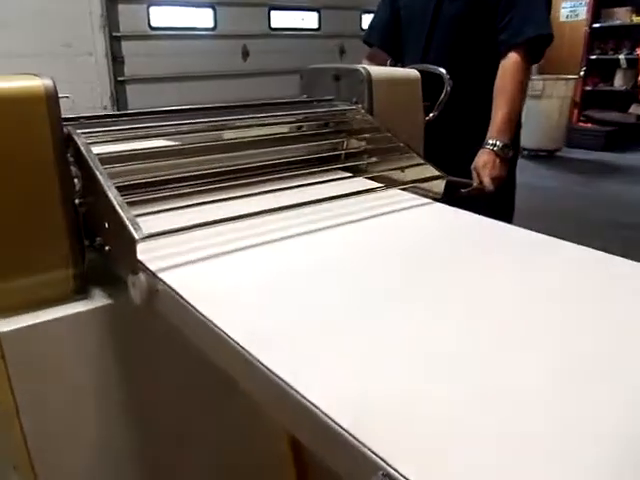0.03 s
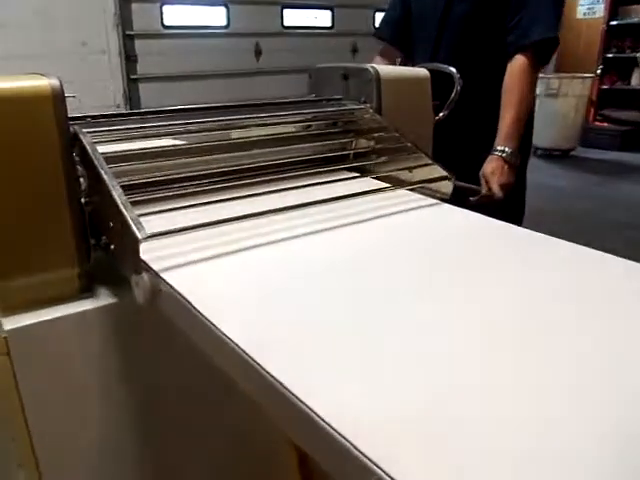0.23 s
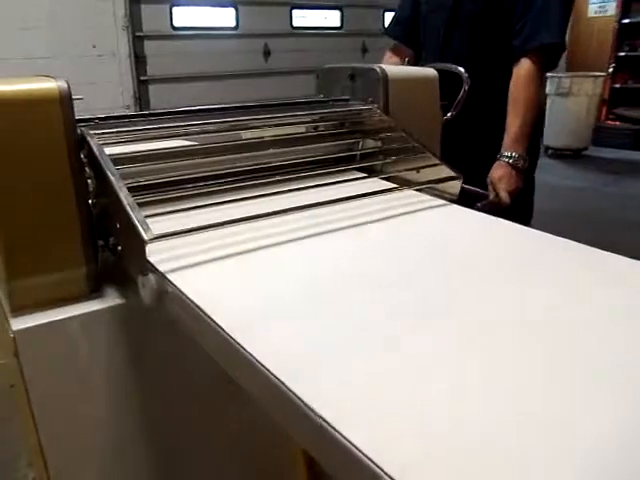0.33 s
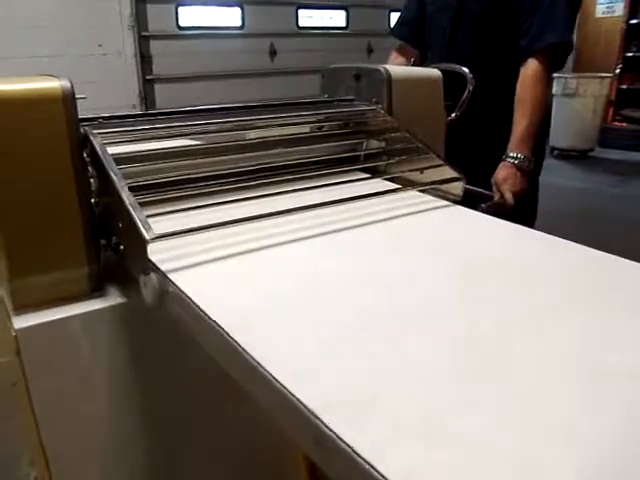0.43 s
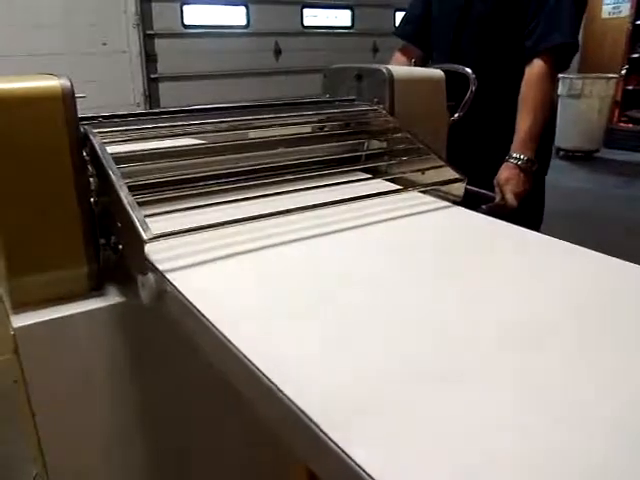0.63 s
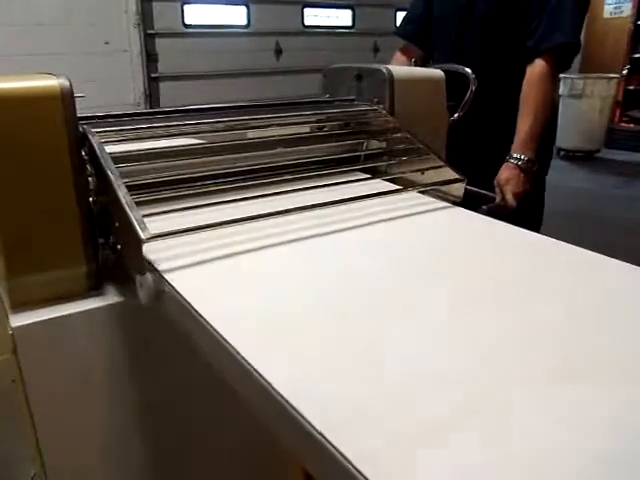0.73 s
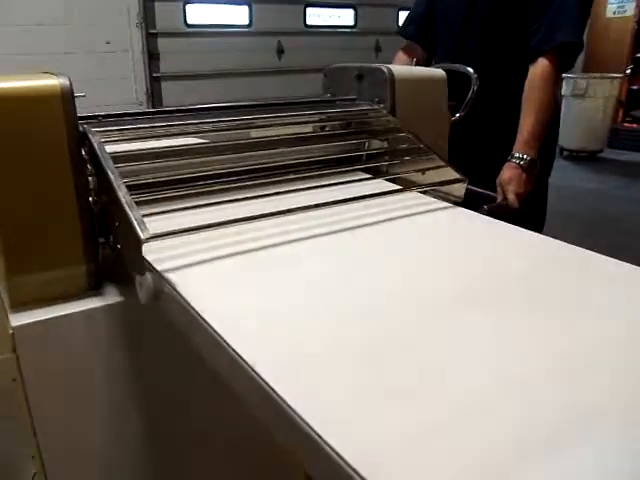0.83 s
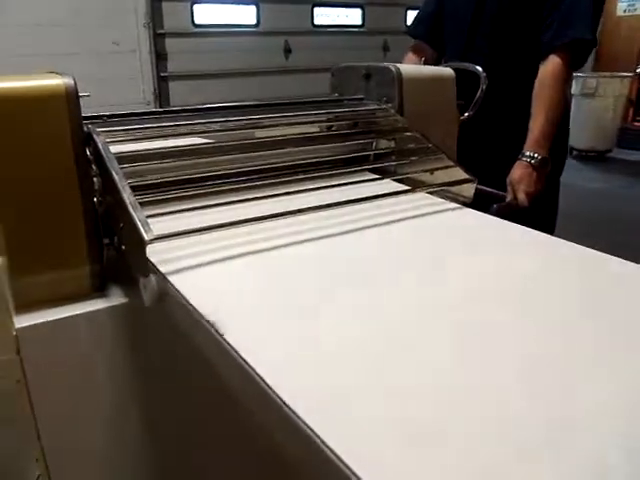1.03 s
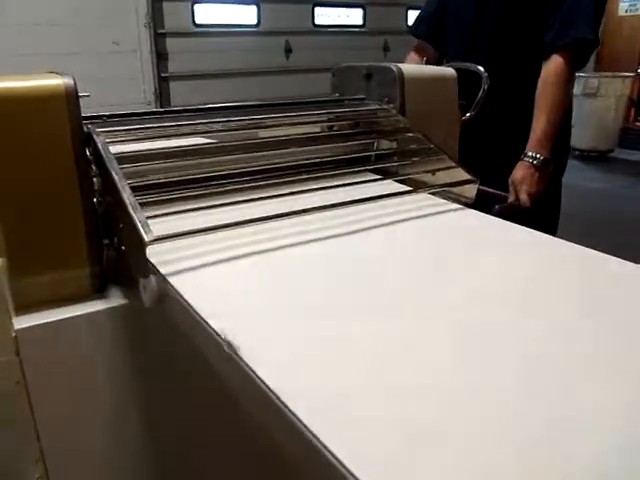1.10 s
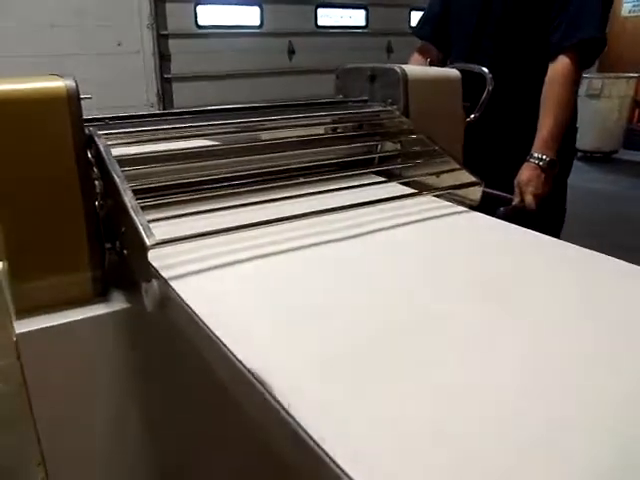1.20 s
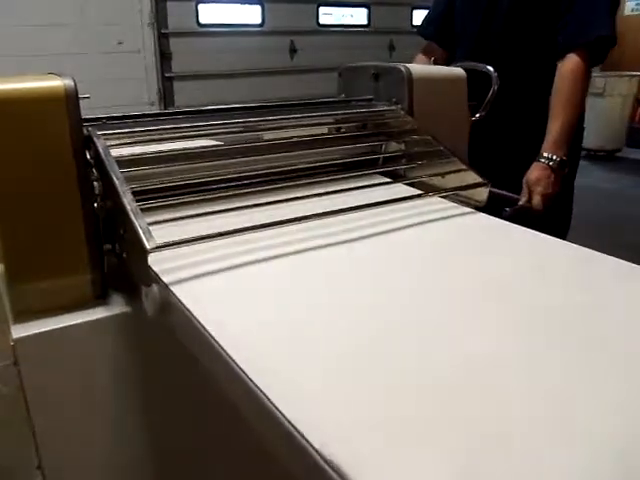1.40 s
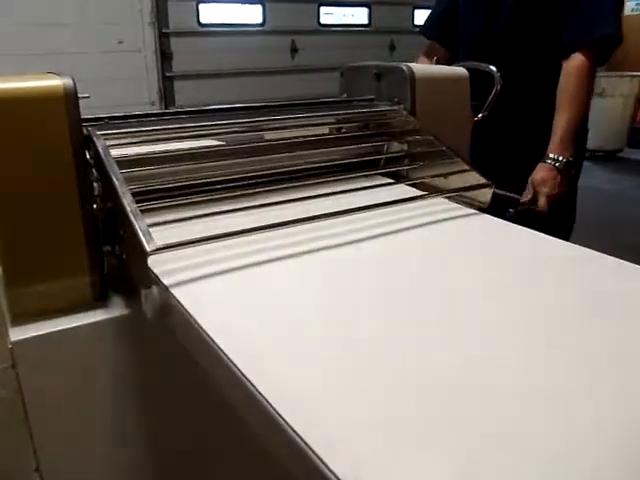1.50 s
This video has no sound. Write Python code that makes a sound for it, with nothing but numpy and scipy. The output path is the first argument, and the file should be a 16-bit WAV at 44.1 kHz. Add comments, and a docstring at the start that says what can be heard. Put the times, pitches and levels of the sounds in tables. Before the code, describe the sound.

Close by in a large workroom, a dough rolling machine engages with a short growl and one heavy, rattling metal clunk. Its motor keeps humming afterwards, while the rollers rumble and the belt whines unevenly.

```python
"""Dough sheeter starting up

A large workroom, one microphone, close enough that the machine stands clear of the room's tail.
The motor takes up with a short growl, the lever drops home with a clunk that shakes the steel frame,
then the drive hums, the belt whines and the rollers rumble.
The recorder's gain ducks at the clunk and stays down."""
import sys
import numpy as np
from scipy import signal
from scipy.io import wavfile

SR = 44100
rng = np.random.default_rng(int(sys.argv[2]) if len(sys.argv) > 2 else 0)


def transcribe(u):
    """Save the signal u as a 16-bit wav file named by the first command-line argument.

    u: samples, shape (n,) or (channels, n), limited to [-1, 1]; the rate is SR.
    q: integer samples, one column per channel.
    """
    v = np.clip(np.atleast_2d(u).T, -1, 1)
    q = np.round(v * 32767).astype(np.int16)
    wavfile.write(sys.argv[1], SR, q)


N = 68355
T = np.arange(N) / SR
MOTOR_ON_S, SPIN_UP_S, ENGAGE_S, TAKE_UP_S = 0.16, 0.11, 0.2476, 0.03

# room air and microphone hiss: (frequency [Hz], relative density [dB])
AIR_SPECTRUM = [(15, -29), (25, -9.5), (102, -1.5), (144, -16), (182, 0.5), (264, -9), (414, -7),
                (525, -18), (616, -16.5), (666, -15.5), (1160, -21), (1970, -30), (2310, -33),
                (3530, -36.5), (14000, -42)]
# faint steady tones in the room: (frequency [Hz], level [dB])
WORKROOM_TONES = [(178, -46.5), (409, -51), (614, -52), (7854, -69.5)]
# ringing of the gears: (frequency [Hz], level before the swell [dB])
GEAR_TONES = [(700, -50.5), (850, -63), (1345, -48), (1373, -50), (1490, -49.5), (1655, -69)]
# swell of that ringing: (time [s], gain [dB])
GEAR_GAIN = [(.35, -7), (.7, 5), (.95, -8.5), (1.2, -2.5), (1.38, -4), (1.47, 7), (1.55, -0.5)]
# rumble of rollers and conveyor: (frequency [Hz], relative density [dB])
ROLLER_SPECTRUM = [(25, 2.5), (36, 4), (55, -13), (95, -2), (130, -1), (190, -1), (330, 4.5), (480, 0),
                   (650, -6.5), (900, -5.5), (1130, -7.5), (1380, -8.5), (1700, -14.5), (2000, -21.5),
                   (2350, -29.5), (3500, -28.5), (6000, -36), (9000, -48), (14000, -56)]
# hum of the drive: (multiple of the shaft rate [-], base level [dB])
HUM_HARMONICS = [(2, -45.5), (4, -36.5), (5, -33), (6, -46.5), (7, -35.5), (8, -35.5), (10, -32),
                 (13, -43.5), (15, -47), (20, -46)]
# swell of the hum up to the fifth harmonic: (time [s], gain [dB])
LOW_HUM_GAIN = [(.35, -1.5), (.5, 5.5), (.63, -3.5), (.78, -2), (.93, 2.5), (1.1, -3), (1.25, 1),
                (1.36, 2.5), (1.44, -2.5), (1.55, 3)]
# growl of the starting motor: (frequency [Hz], level [dB])
GROWL_TONES = [(172, -39), (220, -35.5), (549, -46), (764, -39), (880, -40.5), (1077, -46.5)]
# whine of the belt drive: (time [s], pitch [Hz], level [dB])
WHINE_CURVE = [(0.159, 325, -47.5), (0.226, 324.3, -29), (0.283, 324.2, -22.5), (0.329, 342.8, -30.5),
               (.47, 346.6, -31.5), (.6, 347.4, -23.5), (0.692, 337.8, -23.5), (0.779, 336, -44),
               (0.919, 352.8, -25), (1.029, 353.8, -25.5), (1.108, 330.5, -22), (1.19, 338, -54),
               (1.27, 339.6, -27), (1.352, 349.4, -38.5), (1.42, 354, -24), (1.55, 338.8, -25.5)]
# a second tone that beats against the whine: (time [s], level [dB])
BEAT_LEVEL = [(.3, -57), (1.0, -47), (1.16, -27.5), (1.32, -30), (1.45, -51)]
# modes of the heavy frame: (frequency [Hz], gain [dB], T60 [s])
FRAME_MODES = [(37.7, -28, 0.59), (102.3, -20, 0.35), (187.5, -11.5, 0.26), (230.4, -3, .09),
               (248.7, -3.5, 0.16), (279, -16, 0.3)]
# jolts that reach the frame: (time [s], gain [dB])
FRAME_JOLTS = [(0.2762, -7), (0.2798, -14), (.288, -1)]
# modes of the linkage: (frequency [Hz], gain [dB], T60 [s])
LINKAGE_MODES = [(464, -17.5, 0.23), (542.3, -9.5, .18), (634.4, -8.5, 0.15), (700, -0.5, 0.035),
                 (787, -11, 0.051), (879.3, -10.5, 0.073), (1027, -22, 0.194), (1156, -14.5, 0.09),
                 (1306, -12.5, 0.089), (1396, -13.5, 0.057), (1476, -19.5, 0.086), (1736, -22.5, 0.045),
                 (2750, -29, 0.07), (3420, -34, 0.14)]
# crack of steel on steel: (frequency [Hz], relative density [dB])
CRACK_SPECTRUM = [(200, -8), (700, 12), (1400, 4.5), (2000, -23), (2900, -7.5), (4200, -15), (6500, -9.5),
                  (9000, -13.5), (14000, -14)]
# the lever's clunk and the rattle around it: (time [s], gain [dB], low-pass cutoff [Hz])
LEVER_KNOCKS = [(.179, -25.5, 800), (.208, -23, 918), (.257, -28.5, 4000), (.2708, -1, 3520),
                (.278, -3.5, 2740), (.2825, -4.5, 1410), (.308, -14, 895), (.321, -14.5, 2200),
                (.344, -18, 1600), (.355, -15.5, 700), (.377, -20, 700)]


def from_db(db):
    """Decibels to gain."""
    return 10 ** (np.asarray(db) / 20)


def rms_one(x):
    """Scale to unit power."""
    return x / np.sqrt(np.mean(x ** 2) + 1e-20)


def ramp(start_s, length_s):
    """Rise from 0 to 1."""
    return np.clip((T - start_s) / length_s, 0, 1)


def decay(start_s, t60):
    """Jump to 1, then fall 60 dB every t60 seconds."""
    return (T >= start_s) * from_db(-60 * np.maximum(T - start_s, 0) / t60)


def curve(points):
    """Straight lines through (time, value) points."""
    return np.interp(T, *np.transpose(points))


def lowpass(x, hz):
    """Two-pole low-pass."""
    return signal.sosfilt(signal.butter(2, hz, fs=SR, output="sos"), x + 1e-18)


def drift(rate_hz):
    """Smooth random motion of spread 1."""
    step, settle = 40, 2000
    pole = np.exp(-2 * np.pi * rate_hz * step / SR)
    white = rng.standard_normal(N // step + settle + 2)
    slow = signal.lfilter([1], [1, -2 * pole, pole ** 2], white)[settle:]
    return np.interp(np.arange(N) / step, np.arange(len(slow)), rms_one(slow))


def noise(spectrum, flicker_db):
    """Third-octave bands of noise, each flickering on its own; rms 1."""
    hz, db = np.transpose(spectrum)
    out, edges = 0, 22 * 2 ** (np.arange(30) / 3)
    for low, high in zip(edges, edges[1:]):
        bandpass = signal.butter(3, [low, high], "band", fs=SR, output="sos")
        band = signal.sosfilt(bandpass, rng.standard_normal(N + SR // 4))[-N:]
        band_db = np.interp(np.log(low * high) / 2, np.log(hz), db)
        out += band * from_db(band_db + flicker_db * drift(42))
    return rms_one(out)


def tone(hz, db):
    """A sine that follows a pitch curve, at an rms level."""
    cycles = np.cumsum(np.broadcast_to(hz, N)) / SR + rng.random()
    return np.sqrt(2) * from_db(db) * np.sin(2 * np.pi * cycles)


def ring(start_s, hz, db, t60):
    """One struck mode: a damped sine."""
    return from_db(db) * decay(start_s, t60) * np.sin(2 * np.pi * hz * (T - start_s))


def background():
    """Room air, microphone hiss and a few faint steady tones."""
    air = from_db(-37.5) * noise(AIR_SPECTRUM, flicker_db=0.3)
    return air + sum(tone(hz, db) for hz, db in WORKROOM_TONES)


def room_tail(direct, delay_s=0.014):
    """The workroom's diffuse tail reaches the microphone late; the treble rings longer."""
    white = rng.standard_normal(N)
    low = lowpass(white, 2200)
    tail = low * decay(0, t60=0.25) + (white - low) * decay(0, t60=0.4)
    tail *= ramp(delay_s, delay_s)
    return signal.fftconvolve(direct, tail / np.linalg.norm(tail))[:N]


def gears(wander=0.00585, flutter_db=5):
    """Thin, unsteady tones of the loaded gears."""
    swell_db, out = curve(GEAR_GAIN), 0
    for hz, db in GEAR_TONES:
        pitch = hz * (1 + wander * drift(16.5))
        out += tone(pitch, db + swell_db + flutter_db * drift(42))
    return ramp(ENGAGE_S, TAKE_UP_S) * out


def rollers(settled_db=-28, surge_db=6, surge_s=0.34):
    """Rumble of rollers and conveyor, strongest as they take up."""
    surge = np.exp(-np.maximum(T - ENGAGE_S, 0) / surge_s)
    gain = ramp(ENGAGE_S, TAKE_UP_S) * from_db(settled_db + surge_db * surge)
    return gain * noise(ROLLER_SPECTRUM, flicker_db=0.5)


def drive_hum(shaft_hz=42.47, wander=0.00555, flutter_db=3):
    """Fluttering harmonics of the turning shaft; the lowest swell together."""
    speed_hz = shaft_hz * (1 + wander * drift(3.9))
    out = 0
    for harmonic, db in HUM_HARMONICS:
        swell_db = curve(LOW_HUM_GAIN) if harmonic <= 5 else 0
        out += tone(harmonic * speed_hz, db + swell_db + flutter_db * drift(8.6))
    return ramp(ENGAGE_S, TAKE_UP_S) * out


def motor_growl(flutter_db=6.5, fade_s=0.057):
    """Rough tones grow as the motor spins up and fade once the drive engages."""
    growl = sum(tone(hz, db + flutter_db * drift(45)) for hz, db in GROWL_TONES)
    return growl * ramp(MOTOR_ON_S, SPIN_UP_S) * (1 - ramp(ENGAGE_S, fade_s))


def belt_whine(flutter_db=3, second_tone_hz=376):
    """The belt drive's wavering whine; a second tone swells and beats against it."""
    times, hz, db = np.transpose(WHINE_CURVE)
    whine = tone(np.interp(T, times, hz), np.interp(T, times, db) + flutter_db * drift(22))
    second = tone(second_tone_hz, curve(BEAT_LEVEL))
    return whine * ramp(MOTOR_ON_S, 0.0064) + second * ramp(ENGAGE_S, TAKE_UP_S)


def frame_shake(rise_s=0.002):
    """Jolts around the hardest knocks set the heavy steel frame ringing low."""
    out = 0
    for at, db in FRAME_JOLTS:
        ringing = sum(ring(at, *mode) for mode in FRAME_MODES)
        out += from_db(db) * ringing * ramp(at, rise_s)
    return out


def lever_clunk(spread_s=0.00044):
    """Each knock cracks steel on steel and rings the linkage, with its own brightness."""
    grit = from_db(-8.5) * noise(CRACK_SPECTRUM, flicker_db=0)
    out = 0
    for at, db, cutoff_hz in LEVER_KNOCKS:
        crack = grit * decay(at, t60=0.1)
        # the blow reaches each mode at a slightly different instant
        ringing = sum(ring(at + spread_s * rng.random(), *mode) for mode in LINKAGE_MODES)
        out += from_db(db) * lowpass(ringing + crack, cutoff_hz)
    return out


def scene():
    """The sheeter at the microphone, in mono; only the clunk carries a room tail."""
    clunk = lever_clunk() + frame_shake()
    tail = from_db(-6.5) * room_tail(clunk)
    running = drive_hum() + motor_growl() + belt_whine() + gears() + rollers()
    return (clunk + tail + running + background())[None]


def record(dry):
    """The recorder's gain ducks on a peak and keeps sinking slowly; peaks are rounded, the top is cut."""
    threshold_db, max_over_db, sink_db_per_s = -8, 6, 0.34
    look_ahead_s, attack_s, ceiling, cutoff_hz = 0.0028, 0.002, 1.1, 14200
    level_db = 20 * np.log10(np.abs(dry[0]) + 1e-9)
    over_db = np.clip(level_db - threshold_db, 0, max_over_db)
    sink_db = sink_db_per_s * T
    held_db = np.maximum.accumulate(over_db - sink_db) + sink_db
    early_db = np.interp(T + look_ahead_s, T, held_db)
    pole = np.exp(-1 / (attack_s * SR))
    duck_db = signal.lfilter([1 - pole], [1, -pole], early_db)
    rounded = ceiling * np.tanh(dry * from_db(-duck_db) / ceiling)
    return signal.sosfilt(signal.ellip(10, 0.1, 80, cutoff_hz, fs=SR, output="sos"), rounded)


dry = scene()
out = record(dry)
transcribe(out)
```